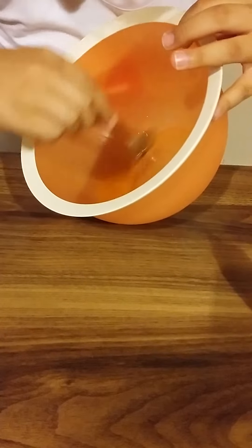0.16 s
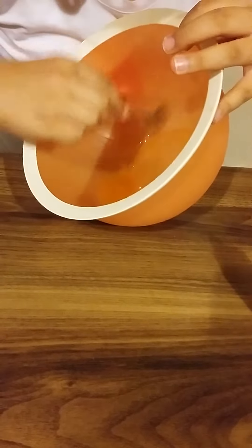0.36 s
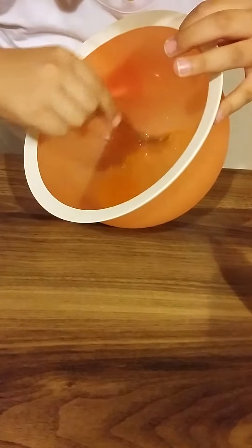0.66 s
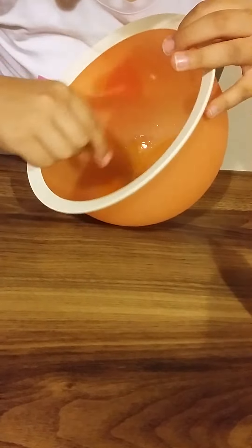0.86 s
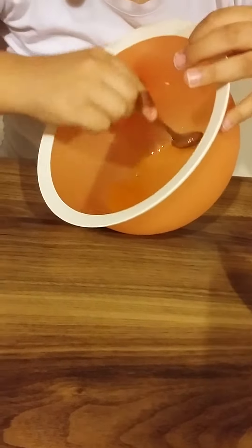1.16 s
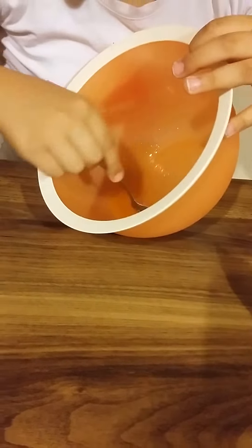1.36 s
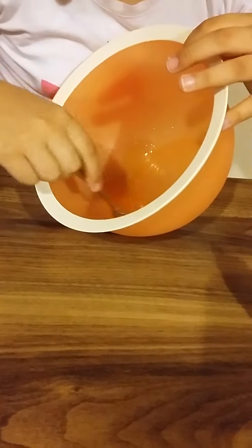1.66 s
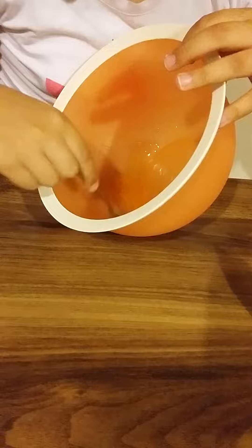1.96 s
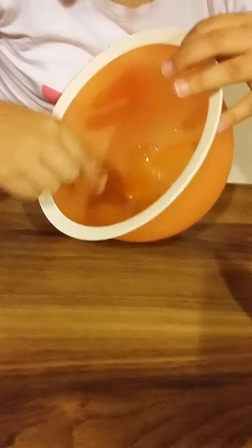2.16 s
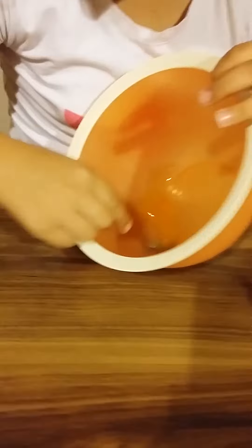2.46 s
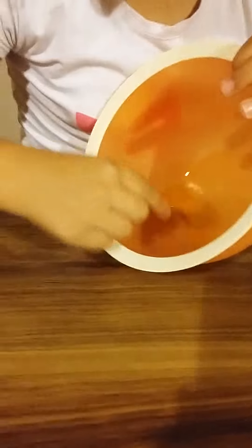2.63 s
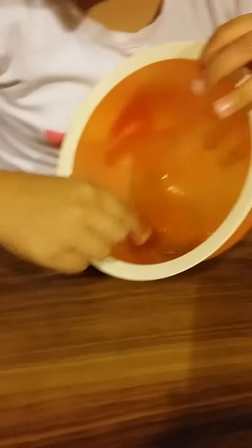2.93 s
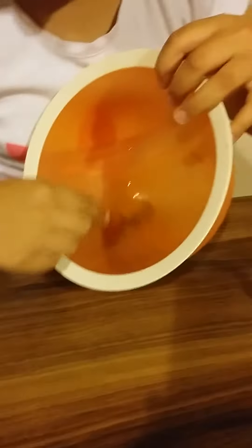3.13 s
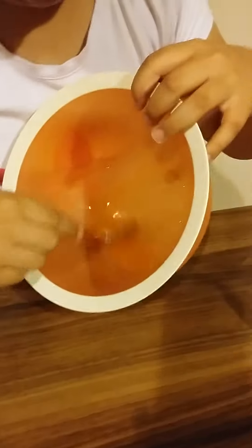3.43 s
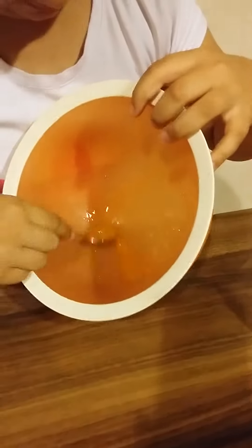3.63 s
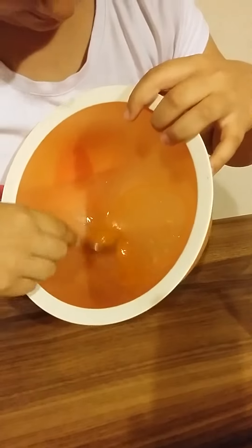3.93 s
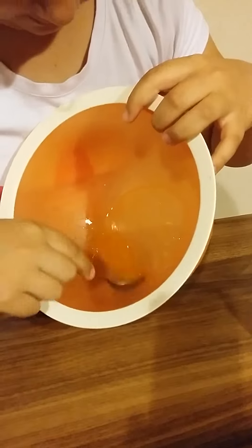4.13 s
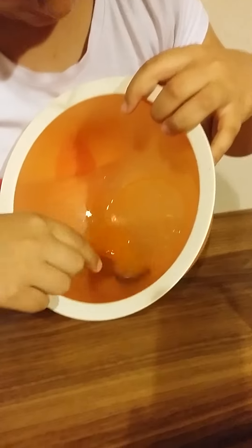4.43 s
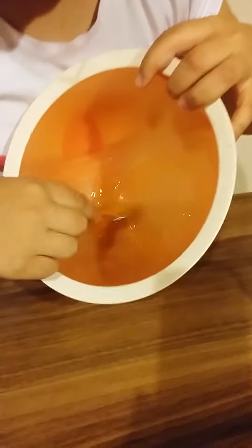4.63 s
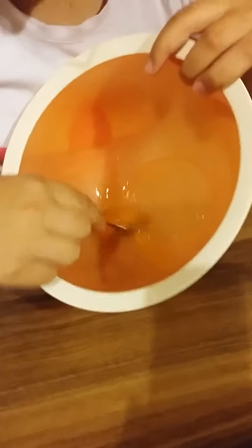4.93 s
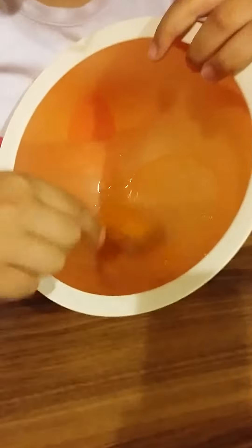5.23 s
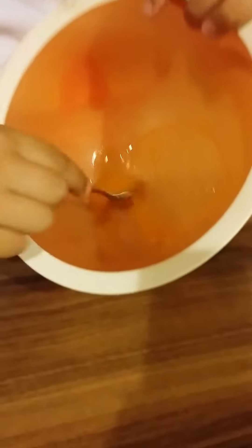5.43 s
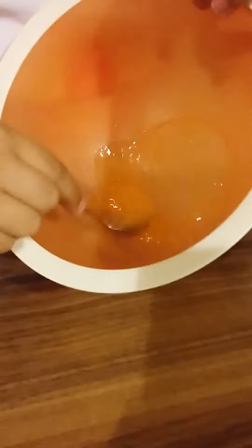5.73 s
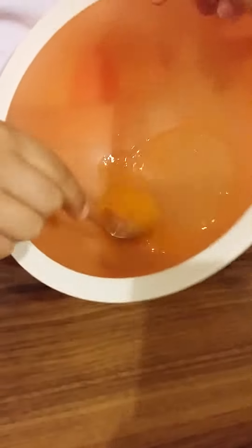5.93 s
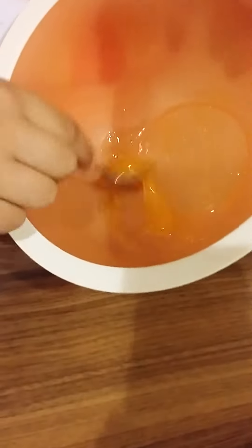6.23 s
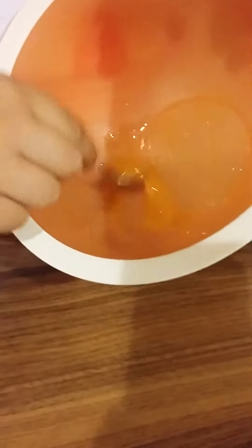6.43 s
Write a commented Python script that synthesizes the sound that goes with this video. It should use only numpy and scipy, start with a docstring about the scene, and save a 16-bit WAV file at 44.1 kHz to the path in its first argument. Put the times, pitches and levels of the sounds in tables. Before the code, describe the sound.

A metal spoon stirs sticky slime in a thin plastic bowl held over a wooden table. Light, separate knocks and short gritty scrapes come first, then a near pause, then regular strokes about four a second, each a hollow plop followed by a drag. The last second is loudest, with hard bright clacks. Close handheld stereo microphone in a small, quiet room with faint hiss.

```python
"""Spoon stirring sticky slime

A metal spoon stirs sticky slime in a thin plastic bowl held over a table in a small room.
Each turn the spoon knocks the wall (damped modes), the slime plops in the hollow (short swelling tones)
and the edge drags gritty along the plastic (stick-slip clicks ringing the modes).
Two microphone ports of a handheld recorder hear it with different treble, over room and recorder noise."""
import sys
import numpy as np
from scipy import signal
from scipy.fft import rfft, irfft, next_fast_len
from scipy.io import wavfile

SR = 44100
rng = np.random.default_rng(int(sys.argv[2]) if len(sys.argv) > 2 else 0)


def bounce(signal):
    """Save signal as a 16-bit WAV file at the path given by the first command-line argument."""
    frames = np.transpose(np.atleast_2d(signal))
    limited = np.clip(frames, -1, 1)
    pcm = np.round(limited * 32767).astype(np.int16)
    wavfile.write(sys.argv[1], SR, pcm)


N = 290178   # length in samples

# Spoon and slime blows. Each row: start in seconds, relative levels in dB of boom, hollow, low wall, high wall,
# edge and snap, hollow pitch in Hz, hollow length in seconds, lean of the wall sound to the left in dB.
BLOW_EVENTS = [(0.424, -48, -38.5, -53, -42.5, -65, -68, 303, 0.0093, 4),
               (0.517, -29, -32.5, -37, -21, -39.5, -72, 405, 0.0083, 3),
               (0.8507, -29, -30.5, -33, -18.5, -34, -77, 384, 0.012, 2.5),
               (0.92, -61, -51, -61, -27, -38.5, -80, 616, 0.0086, 2),
               (0.941, -46, -46, -47, -24, -48, -72, 410, 0.0078, 8),
               (1.2488, -42.5, -27, -34.5, -25.5, -46, -79, 408, 0.0052, 8.5),
               (2.0163, -67, -80, -57, -38.5, -50, -70, 405, 0.0055, 5),
               (2.296, -28.5, -24.5, -33, -36, -38.5, -50, 354, 0.0033, 8),
               (2.5309, -29.5, -20.5, -28, -29, -39, -43, 613, 0.005, 0),
               (2.605, -36, -26.5, -54, -57, -30, -43, 373, 0.0036, 3),
               (2.7732, -28, -30.5, -42.5, -24, -31, -41, 315, 0.0037, 3),
               (2.8643, -45, -34.5, -50.5, -53, -43, -71, 458, 0.0073, 15),
               (3.0276, -26.5, -20, -29, -23, -29, -41, 614, 0.0057, 1),
               (3.29, -28.5, -20, -27.5, -54, -34, -52, 628, 0.0065, -1),
               (3.598, -37, -25, -32.5, -42, -58, -52, 582, 0.0039, 2.5),
               (3.6625, -41.5, -36, -50, -51, -53, -64, 520, 0.0065, 7),
               (3.882, -48.5, -44, -52, -39, -40, -44.5, 525, 0.0022, 2),
               (3.9866, -62, -40.5, -47, -70, -31.5, -63, 328, 0.013, -6),
               (4.2776, -42.5, -29, -47, -43, -38, -51, 495, 0.0063, 12),
               (4.313, -57, -31.5, -48, -53, -36, -68, 540, 0.0075, 10),
               (4.5127, -41.5, -62, -57, -38.5, -41.5, -62, 305, 0.0044, 6),
               (4.5868, -66, -60, -64, -53, -44, -30.5, 706, 0.005, 3),
               (4.6194, -46, -32.5, -64, -44, -42, -57, 474, 0.0072, -4),
               (4.8214, -29, -18, -25.5, -24, -33, -38, 484, 0.0028, -2),
               (4.907, -45, -29.5, -52, -53, -54, -57, 468, 0.0076, -7),
               (5.0925, -32.5, -15, -19.5, -36, -40, -60, 536, 0.0033, -2),
               (5.1339, -32.5, -15.5, -32, -49, -45, -54, 457, 0.0056, 4),
               (5.3603, -33.5, -18.5, -22.5, -28, -24.5, -54, 554, 0.0037, -6.5),
               (5.4122, -34.5, -17.5, -40, -48, -45, -56, 440, 0.0078, -14),
               (5.602, -37, -29, -53, -37, -66, -69, 357, 0.0025, 2),
               (5.8269, -31.5, -17.5, -26.5, -21, -11.5, -18.5, 362, 0.0045, 3.5),
               (5.8537, -32, -12, -28.5, -33, -35, -43, 443, 0.006, 1),
               (6.033, -31, -19, -24.5, -15, -11, -19.5, 379, 0.0066, 2),
               (6.0645, -30, -13.5, -33, -32, -29, -52, 438, 0.0067, 5),
               (6.2539, -33, -20.5, -28, -20, -12.5, -19.5, 360, 0.0042, 11.5),
               (6.297, -40.5, -16.5, -45, -46, -41, -47, 425, 0.006, 1),
               (6.4617, -34, -16.5, -20.5, -23, -10, -18, 393, 0.0031, 3),
               (6.4877, -43, -12, -46, -25, -36, -37, 446, 0.0053, -1)]
# Modes of the spoon edge, the bright sticky snap and the bowl wall, low and high.
# Each row: frequency in Hz, relative level in dB, 60 dB decay time in seconds.
EDGE_MODES = [(2790, -3, 0.0082), (2942, -2, 0.018), (3760, -6, 0.0096), (4310, -3, 0.0099),
              (4977, 2, 0.0071), (5710, -6, 0.0088), (6630, -1, 0.0029)]
SNAP_MODES = [(7480, 12, 0.0021), (9540, -3, 0.0079), (10800, -1, 0.0047), (13500, -1, 0.0026),
              (15200, -8, 0.0025)]
LOW_WALL_MODES = [(629, -6, 0.056), (1002, 1, 0.01), (1231.4, -12, 0.042), (1358, -4.5, 0.015)]
HIGH_WALL_MODES = [(1680, 0.5, 0.0083), (2046, 0, 0.012), (2092, -18, 0.12), (2394, -2, 0.011)]

RIGHT_LAG_S, LAG_SPREAD_S = 0.00014, 0.00014   # delay of the right port, and its spread from mode to mode


def from_db(db):
    """Amplitude ratio: 20 dB is a factor of ten."""
    return 10 ** (np.asarray(db) / 20)


def rms_one(x):
    """Normalisation to unit effective value."""
    return x / np.sqrt(np.mean(x ** 2) + 1e-20)


def at_hz(points, hz):
    """Interpolation on a logarithmic frequency scale."""
    table_hz, values = np.array(points).T
    return np.interp(np.log(hz), np.log(table_hz), values)


def both_ports(x):
    """Travel-time difference: the right port is farther off and hears the sound later."""
    samples = np.arange(N)
    return np.array([x, np.interp(samples - RIGHT_LAG_S * SR, samples, x, left=0)])


def ring(clicks, hz, t60):
    """Damped resonator: a unit click sets a decaying sine of height 1 ringing."""
    radius = from_db(-60 / (t60 * SR))
    w = 2 * np.pi * hz / SR
    return signal.lfilter([0, np.sin(w)], [1, -2 * radius * np.cos(w), radius * radius], clicks + 1e-18)


def struck(modes, at, level_db, spread_db, pan_db=0):
    """Modal excitation: clicks ring every mode; strength and path to each port change with mode and blow."""
    out = np.zeros((2, N))
    chance = rng.standard_normal((len(at), len(modes), 3))
    for k, (hz, mode_db, t60) in enumerate(modes):
        left_chance, right_chance, lag_chance = chance[:, k].T
        lag = np.round(np.abs(RIGHT_LAG_S + LAG_SPREAD_S * lag_chance) * SR).astype(int)
        clicks = np.zeros((2, N))
        clicks[0, at] = from_db(level_db + mode_db + pan_db / 2 + spread_db * left_chance)
        clicks[1, at + lag] = from_db(level_db + mode_db - pan_db / 2 + spread_db * right_chance)
        out += (-1) ** (k + 1) * ring(clicks, hz, t60)   # neighbouring modes have opposite sign
    return out


def swelling_tone(events, swell):
    """Transient tone: each (s, dB, Hz, length s) swells, holds briefly and chokes."""
    out = np.zeros(N + SR)
    t = np.arange(SR // 4) / SR
    for s, level_db, hz, length in events:
        attack = 1 - np.exp(-t / (swell * length))
        choke = np.exp(-(t / (1.143 * length)) ** 2.38)
        out[round(s * SR):][:len(t)] += from_db(level_db) * attack * choke * np.sin(2 * np.pi * hz * t)
    return out[:N]


def port(x, peaks):
    """Resonant colouring of a port: a chain of peaking filters."""
    for hz, width_hz, gain_db in peaks:
        a = from_db(gain_db / 2)
        w = 2 * np.pi * hz / SR
        q = np.tan(np.pi * width_hz / SR)
        x = signal.lfilter([1 + q * a, -2 * np.cos(w), 1 - q * a], [1 + q / a, -2 * np.cos(w), 1 - q / a], x)
    return x


def air():
    """Partially correlated noise: half-octave bands, each with its own level and left-right likeness."""
    # Quiet room and recorder hiss. Each row: frequency in Hz, relative level in dB per Hz.
    air_spectrum = [(15, -46), (25, -33), (33, -12), (70, -6.5), (111, -3.5), (137, -5.5), (263, -15),
                    (285, -12), (545, -19), (714, -15.5), (3820, -30.5), (10100, -31.5), (16000, -33.5)]
    # Likeness of left and right. Each row: frequency in Hz, correlation from -1 to 1.
    port_likeness = [(60, 0.74), (240, 0.51), (950, 0.18), (3770, -0.17), (15000, -0.03)]
    air_db = -64.5   # effective level of the mean of both ports

    out = np.zeros((2, N))
    edges = 25 * 2 ** np.arange(0, 9.6, .5)
    white = rng.standard_normal((2, 2, N))   # neighbouring bands use different noise
    for k, (low, high) in enumerate(zip(edges, edges[1:])):
        band = signal.butter(2, [low, high], "band", fs=SR, output="sos")
        mid, side = signal.sosfilt(band, white[k % 2])
        hz = np.sqrt(low * high)
        alike = np.clip(at_hz(port_likeness, hz), -.95, .95)
        stereo = np.sqrt(1 + alike) * mid + np.sqrt(1 - alike) * side * [[1], [-1]]
        out += from_db(at_hz(air_spectrum, hz)) * stereo
    return from_db(air_db) * out / np.sqrt(np.mean(out.mean(axis=0) ** 2))


def pressure():
    """Contact force as gains of scrape, rumble, rasp and sizzle: strokes rise, hold, lift, fade; skids fade."""
    # The stroke of each turn, edge pressed along the wall. Each row: moment of full pressure, rise and hold
    # in seconds, relative levels in dB of scrape, rumble, rasp (low edge modes) and sizzle (high edge modes).
    stroke_events = [(0.0, .01, .1, -52.5, -51, -53.5, -58), (0.556, .015, 0.029, -52.5, -54, -56.5, -62.5),
                     (0.91, 0.027, 0.064, -47.5, -50, -54.5, -62),
                     (1.331, 0.024, 0.041, -47.5, -57, -51, -62.5),
                     (1.826, 0.062, 0.022, -58.5, -69, -51, -51.5),
                     (2.104, 0.056, 0.039, -50.5, -48.5, -48, -51.5),
                     (2.35, 0.033, 0.039, -50, -45.5, -48.5, -47),
                     (2.591, 0.023, 0.032, -47, -37.5, -48, -52), (2.846, 0.02, 0.031, -54, -50, -57, -60),
                     (3.1, .015, 0.045, -51.5, -52.5, -52, -53.5),
                     (3.373, 0.031, 0.03, -50.5, -55.5, -54.5, -52.5),
                     (3.667, 0.024, 0.054, -50, -49, -51, -55.5),
                     (3.975, 0.047, 0.017, -53.5, -46.5, -50.5, -55.5),
                     (4.276, 0.081, 0.059, -52, -45, -53.5, -56.5),
                     (4.588, 0.055, 0.046, -51.5, -48.5, -53.5, -54),
                     (4.902, 0.032, .05, -55.5, -46.5, -56.5, -54.5),
                     (5.149, .02, 0.044, -47.5, -37.5, -50.5, -52),
                     (5.396, 0.018, 0.035, -45, -38, -48, -44.5),
                     (5.631, 0.041, 0.054, -55, -53, -55, -49.5), (5.855, .01, 0.05, -48, -38, -51.5, -48),
                     (6.057, .01, 0.044, -44.5, -45, -47, -46), (6.266, 0.019, .04, -43.5, -48, -51, -46.5),
                     (6.482, .01, 0.051, -49, -41, -51, -51)]
    # Short fading skids, mostly just after a knock.
    # Each row: start in seconds, relative levels in dB of scrape, rumble, rasp.
    skid_events = [(0.434, -69, -58.5, -69), (0.524, -46.5, -45, -66), (0.86, -47, -42, -60),
                   (1.259, -51, -41.5, -68), (1.765, -61.5, -64.5, -78), (2.025, -68, -76, -73),
                   (2.305, -57, -43.5, -68), (2.541, -54.5, -43, -65), (2.782, -56.5, -52.5, -60),
                   (3.037, -49.5, -43, -52.5), (3.299, -51, -42.5, -60.5), (3.608, -58, -46.5, -67),
                   (3.843, -68, -61, -71), (4.52, -61, -59, -68), (4.83, -46.5, -42, -62),
                   (5.102, -53, -34, -78), (5.37, -45, -41, -58), (5.837, -40, -38, -48),
                   (6.042, -43, -31.5, -39.5), (6.26, -44, -34, -48), (6.47, -39.5, -43, -45)]
    rise_db = 39.5   # a stroke gains this much over its rise
    lift_db, lift_s = -6, 0.004   # quick drop as the pressure lets go
    stroke_fade = np.c_[[143, 147, 225, 270]]   # dB per s: scrape, rumble, rasp, sizzle
    skid_fade = np.c_[[193, 170, 286, 320]]
    skid_sizzle_db = -4.5   # sizzle of a skid against its rasp

    t = np.arange(0, N / SR + .002, .001)
    power = 1e-12
    for s, rise, hold, *level_db in stroke_events:
        after = np.maximum(t - s - hold, 0)
        shape_db = rise_db * np.minimum(t - s, 0) / rise + lift_db * (1 - np.exp(-after / lift_s))
        power = power + from_db(2 * (np.c_[level_db] + shape_db - stroke_fade * after))
    for s, *level_db in skid_events:
        level_db = level_db + [level_db[-1] + skid_sizzle_db]
        fading_db = np.c_[level_db] - skid_fade * np.maximum(t - s, 0)
        power = power + (t >= s) * from_db(2 * fading_db)
    return [np.interp(np.arange(N) / SR, t, np.sqrt(p)) for p in power]


def rumble_gain():
    """Amplitude gating: the rumble sinks for some ms around each blow, leaving the plop clear; 1 = full rumble."""
    t, dip = np.arange(N) / SR, np.zeros(N)
    for s in np.array(BLOW_EVENTS)[:, 0]:
        near = slice(round((s - .03) * SR), round((s + .04) * SR))
        one_dip = np.exp(-((t[near] - s - .001) / .009) ** 4)
        dip[near] = np.maximum(dip[near], one_dip)
    return 1 - .85 * dip


def grit(per_s, uneven_db, clump_db):
    """Stick-slip as a random point process: clicks in clumps of a few ms, a few much bigger than the rest."""
    clumps = np.repeat(rng.standard_normal(N // 160 + 1), 160)[:N]
    excess = np.minimum(rng.exponential(1, N), 4)
    sizes = from_db(uneven_db * excess + clump_db * clumps) * rng.choice([-1, 1], N)
    return sizes * (rng.random(N) < per_s / SR)


def drag():
    """Friction-driven modes: slips under the edge shake wall, hollow and edge, some heard by one port only."""
    # Modes of the hollow. Each row: frequency in Hz, relative level in dB, 60 dB decay time in seconds.
    rumble_modes = [(245, 3, 0.04), (374.3, -1.5, 0.12), (516, 4.5, 0.075), (560, 9, 0.028),
                    (648, 2, 0.058)]
    slips_per_s, crackle_per_s = 1800, 160
    crackle_db = -9.5   # sticky crackle against the sizzle
    patch_db, patch_s = 4.0, .018   # the wet contact shifts: each mode swells and sinks on its own

    scrape, rumble, rasp, sizzle = pressure()
    low_edge = EDGE_MODES[:3]
    bright = EDGE_MODES[3:] + [(hz, db - 16.5, t60) for hz, db, t60 in SNAP_MODES]
    # modes, gain, one-port slips against shared ones in dB, roughness in dB, slips per s
    layers = (
        (LOW_WALL_MODES[1:] + HIGH_WALL_MODES, scrape, -2, 3.0, slips_per_s),
        (rumble_modes, rumble * rumble_gain(), -9, 1.2, slips_per_s),   # steadier grit, so the rumble stays even
        (low_edge, rasp, -4, 3.2, slips_per_s),
        (bright, sizzle, -4, 3.2, slips_per_s),
        (low_edge + bright, sizzle * from_db(crackle_db), -8, 4.0, crackle_per_s))
    t = np.arange(N) / SR
    out = np.zeros((2, N))
    for modes, level, own_db, rough_db, rate in layers:
        shared, *own = (grit(per_s=rate, uneven_db=rough_db, clump_db=0.32 * rough_db) for _ in range(3))
        slips = both_ports(shared) + from_db(own_db) * np.array(own)
        # summed energy of the ringing modes, so that the gain sets the layer's level
        power = sum(from_db(2 * db) * t60 * SR / (4 * np.log(1000)) for hz, db, t60 in modes)
        for hz, mode_db, t60 in modes:
            favour = np.repeat(rng.standard_normal(N // 64 + 1), 64)[:N]   # slips favour different modes
            wander = np.interp(t / patch_s, np.arange(N // 200), rng.standard_normal(N // 200))
            drive = level * from_db(patch_db * wander) * rms_one(slips * favour)
            out += from_db(mode_db) * ring(drive, hz, t60) / np.sqrt(power)
    return out


def bumps():
    """Low-frequency pulses: dull bumps of the hand."""
    # Each row: start in seconds, relative level in dB, pitch in Hz, length in seconds.
    hand_bumps = [(0.026, -46, 114, 0.043), (0.209, -33, 68, 0.014), (0.27, -34.5, 67, 0.038),
                  (2.043, -41, 108, 0.027), (3.719, -65, 99, 0.035), (3.885, -44.5, 85, 0.038),
                  (4.18, -41.5, 97, 0.044)]
    return both_ports(swelling_tone(hand_bumps, swell=0.16))


def ticks():
    """Impulsive release: a slip rings the edge; a sticky thread that tears adds a bright snap."""
    # The biggest slips and snaps. Each row: start in seconds, relative edge level in dB,
    # relative snap level above the edge in dB.
    slip_events = [(0.0494, -30, -27), (1.8322, -25, -17), (2.134, -26, -39), (2.355, -18, -28),
                   (2.3733, -19, -29), (2.8178, -39, 1), (3.112, -22.5, -28), (3.129, -29, -22),
                   (3.5183, -39, -13), (3.673, -29, -25), (3.848, -30.5, -9), (3.946, -34, 2.5),
                   (3.9775, -26, -25), (3.9926, -23, -23), (4.1854, -43, -12), (4.2518, -35.5, 11.5),
                   (4.3148, -24, -21), (4.632, -30, -30), (4.7944, -38, 2.5), (4.832, -32, 6),
                   (4.8704, -47, 5.5), (4.978, -48, -2), (5.053, -40, -4), (5.1138, -35, -7),
                   (5.1684, -21, -33), (5.4022, -19, -23), (5.59, -35, -24), (5.642, -42, -10),
                   (5.6603, -24.5, -9), (5.693, -26.5, -23), (5.9004, -32, -26), (6.0856, -28, -19),
                   (6.249, -17, -22), (6.291, -20, -17)]
    s, edge_db, snap_db = np.transpose(slip_events)
    at = np.round(s * SR).astype(int)
    edge = struck(EDGE_MODES, at, edge_db - 16, spread_db=3.0)
    snap = struck(SNAP_MODES, at, edge_db + snap_db - 19, spread_db=9.5)
    return edge + snap


def thud(at, level_db):
    """Low-passed impulse: a soft push sets the low modes of table and room going in step, alike at both ports."""
    # Modes of table and room. Each row: frequency in Hz, relative level in dB, 60 dB decay time in seconds.
    boom_modes = [(79.6, -24, 0.11), (100.5, 2.5, 0.32), (112.5, 5, 0.27), (162.8, 2.5, 0.32),
                  (185.9, 0, 0.3), (256, -56, 0.16)]
    push = np.zeros(N)
    push[at] = from_db(level_db)
    push = signal.lfilter(*signal.butter(2, 190, fs=SR), push)
    return both_ports(sum(from_db(mode_db) * ring(push, hz, t60) for hz, mode_db, t60 in boom_modes))


def blows():
    """Impact excitation: table and room boom, the bowl's hollow sounds its pitch, wall and edge crack."""
    (s, boom_db, hollow_db, low_db, high_db, edge_db, snap_db,
     hz, length, pan_db) = np.transpose(BLOW_EVENTS)
    at = np.round(s * SR).astype(int)
    boom = thud(at, boom_db - 9)
    hollow = both_ports(swelling_tone(zip(s, hollow_db + 1.5, hz, length), swell=0.13))
    # the slime slumps below the hollow's pitch
    slump = both_ports(swelling_tone(zip(s, hollow_db - 10, 0.56 * hz, 1.48 * length), swell=0.11))
    low_wall = struck(LOW_WALL_MODES, at, low_db + 3.5, 3.8, pan_db)
    high_wall = struck(HIGH_WALL_MODES, at, high_db - 5.5, 0.69, pan_db)
    edge = struck(EDGE_MODES, at, edge_db - 2, spread_db=0.35)
    snap = struck(SNAP_MODES, at, snap_db - 9.5, spread_db=6.0)
    return boom + hollow + slump + low_wall + high_wall + edge + snap


def bubbles():
    """Bubble resonance: small bubbles in the slime sound brief high tones."""
    # Each row: start in seconds, relative level in dB, pitch in Hz, length in seconds.
    slime_bubbles = [(1.603, -60, 1370, 0.0062), (1.755, -59, 1450, 0.008)]
    return both_ports(swelling_tone(slime_bubbles, swell=0.2))


def room(x):
    """Reverberation by feedback delays, duller on every round; the lows reach both ports alike."""
    room_t60_s, wall_cut_hz, shared_below_hz = 0.45, 9000, 700
    size = next_fast_len(N + SR)
    w = 2 * np.pi * np.arange(size // 2 + 1) / size
    dull = np.exp(-2 * np.pi * wall_cut_hz / SR)
    loss = (1 - dull) / (1 - dull * np.exp(-1j * w))
    tails = np.zeros((2, len(w)), complex)
    for k, lag in enumerate(np.geomspace(.007, .041, num=24) * SR):
        trip = from_db(-60 * lag / SR / room_t60_s) * loss * np.exp(-1j * w * lag)
        tails[k % 2] += trip / (1 - trip) * (-1) ** (k // 2)   # geometric series of round trips
    shared = 1 / (1 + (w * SR / (2 * np.pi * shared_below_hz)) ** 2)
    tails = shared * tails[0] + (1 - shared) * tails
    return irfft(rfft(x, size) * tails, size)[:, :N]


def scene():
    """Superposition: direct sound and room tail pass the two ports, a bass cut follows, and air is added."""
    # Port colours as peaks or dips. Each row: centre in Hz, width in Hz, gain in dB.
    left_colour = [(270, 200, 0.5), (507, 390, -1.5), (674, 650, -2.5), (1505, 420, 4.5),
                   (2560, 2000, -0.5), (5590, 750, 5), (8760, 2600, 2.5)]
    right_colour = [(700, 510, -3.5), (2440, 2800, 6), (3350, 275, 12), (4940, 670, 1.5), (8700, 9800, -7)]
    # The right port faces away from the bowl, dulling its direct sound. Each row: as above.
    right_shadow = [(8900, 10800, -11)]
    room_db, bass_cut_hz = -27, 103

    left, right = drag() + bumps() + ticks() + blows() + bubbles()
    direct = np.array([left, port(right, right_shadow)])
    left, right = direct + from_db(room_db) * room(left)
    ports = np.array([port(left, left_colour), port(right, right_colour)])
    bass_cut = signal.butter(3, bass_cut_hz, "high", fs=SR, output="sos")
    return signal.sosfilt(bass_cut, ports) + air()


def record(dry):
    """Saturation and band limiting: peaks round off toward a ceiling, the top is cut."""
    ceiling, cutoff_hz = 0.89, 17100
    rounded = ceiling * np.tanh(dry / ceiling)
    top_cut = signal.cheby2(14, 60, cutoff_hz, fs=SR, output="sos")
    return signal.sosfilt(top_cut, rounded)


dry = scene()
out = record(dry)
bounce(out)
```